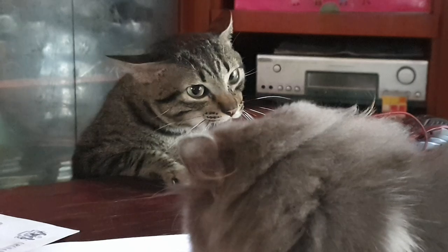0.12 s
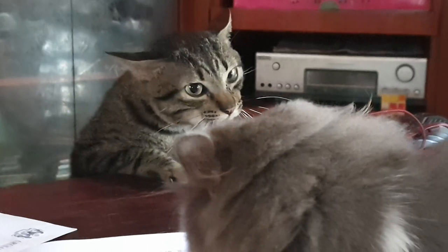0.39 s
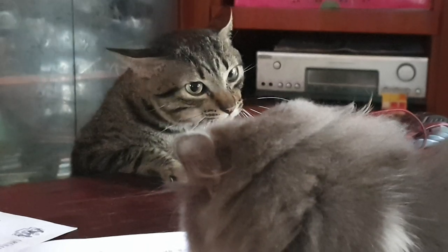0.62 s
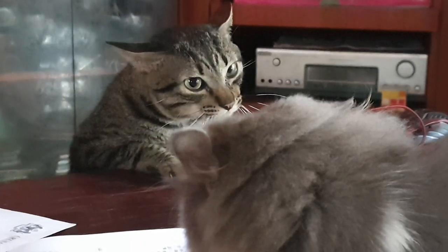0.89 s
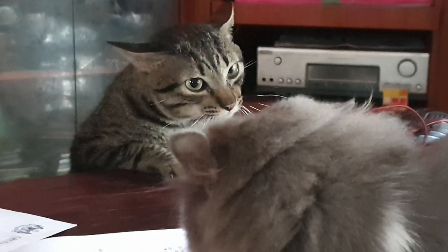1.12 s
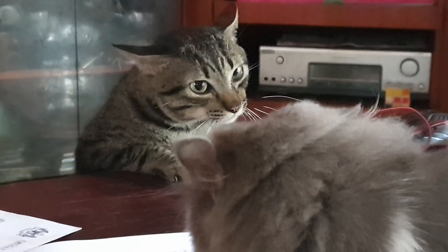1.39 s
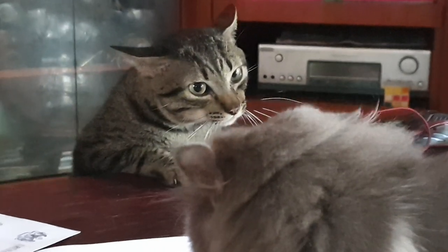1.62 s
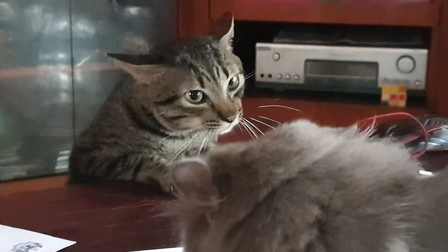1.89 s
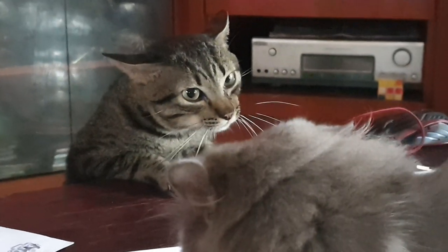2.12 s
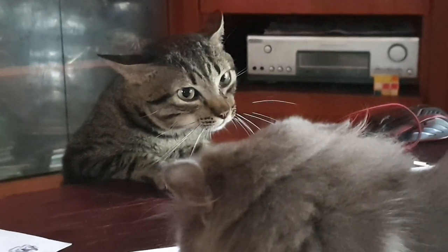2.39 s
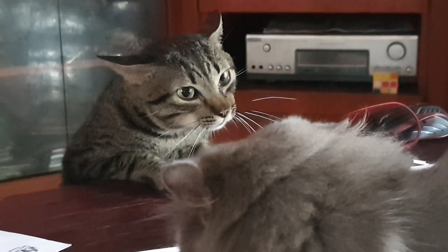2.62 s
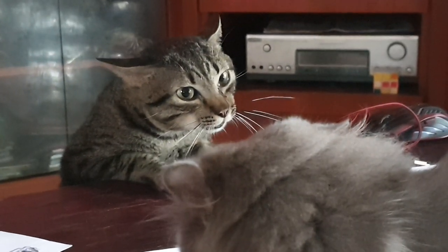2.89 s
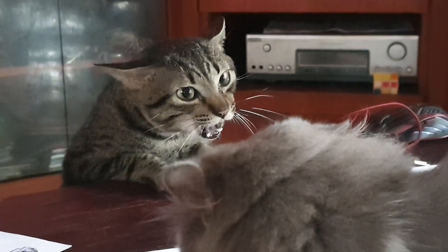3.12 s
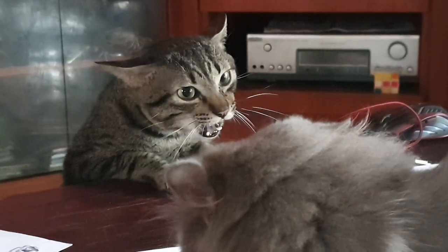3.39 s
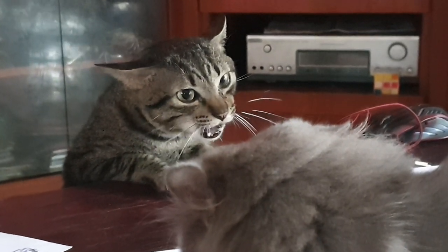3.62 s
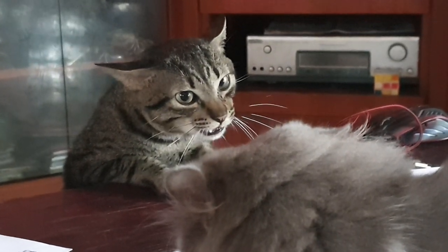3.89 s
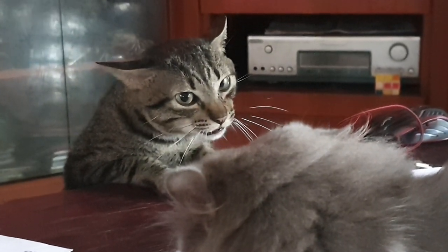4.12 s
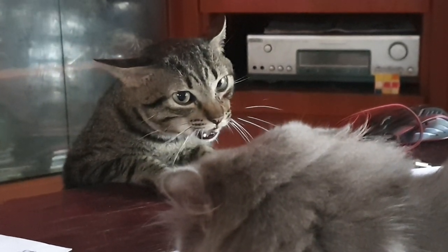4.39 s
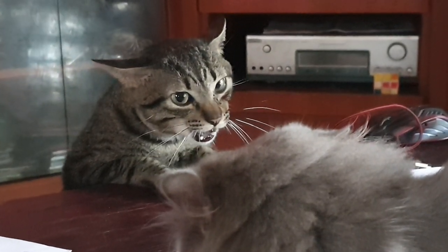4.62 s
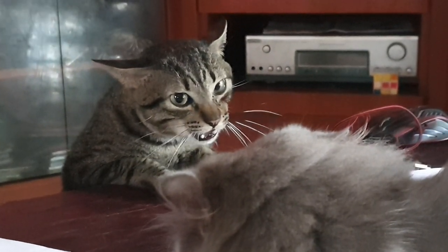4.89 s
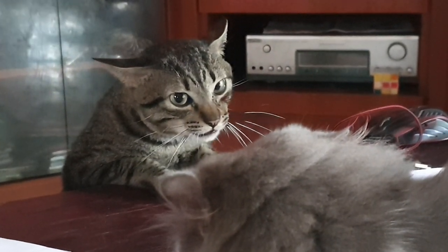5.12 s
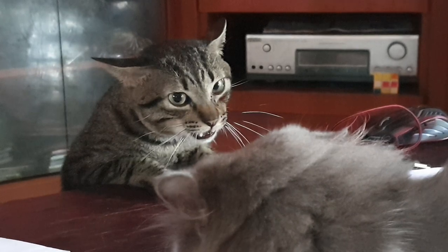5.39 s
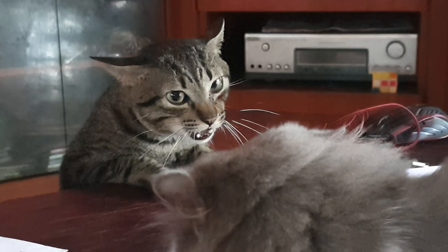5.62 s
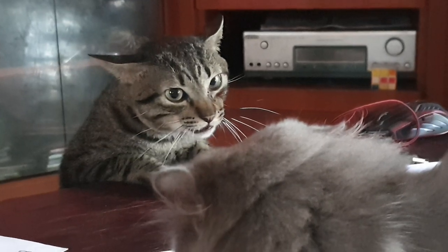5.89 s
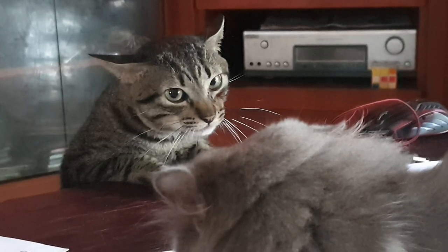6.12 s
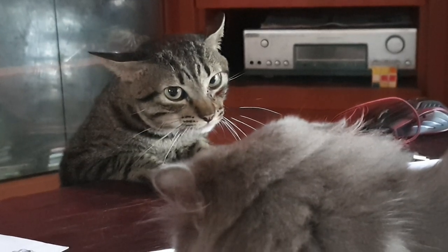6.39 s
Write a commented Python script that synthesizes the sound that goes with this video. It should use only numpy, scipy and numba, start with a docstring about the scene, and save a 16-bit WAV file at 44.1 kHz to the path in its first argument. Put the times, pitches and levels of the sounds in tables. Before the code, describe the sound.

Two angry yowls from one cat facing another indoors. The first starts in full voice and glides down quickly to a rough little release. About two seconds of near-quiet follow: outside rumble, soft hiss, small ticks and rustling. The second lasts over three seconds, scooping up to a piercing cry, then bending through changing vowels before it drops away. Hard surfaces smear each glide; a low engine passes outside. Close stereo pickup, louder on the left.

```python
"""Cat yowling in a living room

A cat on a table yowls twice at another cat, a metre from a small stereo camera in a hard-walled room.
Pulses of its vocal folds pass through throat and mouth resonances; the room smears every glide.
Traffic rumbles outside as filtered noise; a far horn and a passing engine are sums of harmonics.
Paws or hands rustle faintly, as short bursts of noise."""
import sys
import numpy as np
from scipy import signal
from scipy.fft import rfft, irfft, next_fast_len
from scipy.io import wavfile
from scipy.ndimage import uniform_filter1d
from numba import njit

SR = 44100
rng = np.random.default_rng(int(sys.argv[2]) if len(sys.argv) > 2 else 0)


def gain_from_db(level_db):
    """Turn a decibel level (scalar or array-like) into a linear amplitude factor."""
    decades = np.asarray(level_db, float) / 20
    return 10 ** decades


def to_wav(sig):
    """Store sig (one row per channel, or 1-D mono) as 16-bit WAV at the path in sys.argv[1].

    Samples outside -1..1 are clipped; the rate is SR.
    """
    pcm = np.clip(np.atleast_2d(sig), -1, 1) * 32767
    pcm = np.round(pcm).astype(np.int16)
    wavfile.write(sys.argv[1], SR, pcm.T)  # frames by channels


N = 287091  # samples to keep
LEAD = 16384  # samples of sound before the start, so that the room already rings
T = (np.arange(N + LEAD) - LEAD) / SR  # seconds, negative during the lead


def on_log(hz, table, column=1):
    """Read a table whose first column is Hz, on a log-frequency axis."""
    table = np.array(table, float)
    return np.interp(np.log(np.maximum(hz, 1)), np.log(table[:, 0]), table[:, column])


def colour(x, gain):
    """Filter by a gain function of frequency."""
    size = next_fast_len(x.shape[-1])
    spectrum = rfft(x, size) * gain(np.fft.rfftfreq(size, 1 / SR))
    return irfft(spectrum, size)[..., :x.shape[-1]]


def unit(x):
    """Scale to rms 1."""
    return x / np.sqrt(np.mean(x ** 2))


def walk(rate):
    """Smooth chance that turns about rate times a second; spread 1."""
    size = int(SR / rate / 2)
    steps = np.repeat(rng.standard_normal(len(T) // size + 1), size)[:len(T)]
    return unit(uniform_filter1d(steps, 2 * size))


def fold_cycles(firm_start_s):
    """Vocal folds: taut ones beat evenly, slack ones unevenly. Gives pitch, roughness and phase."""
    # The pitch of the folds. Each row: time in seconds, pitch in Hz.
    pitch = [(0, 549.2), (.1, 548.7), (.28, 500.2), (.35, 469), (.47, 435.4), (.63, 410.7), (.79, 380),
             (.84, 355), (3.0, 215), (3.05, 310.5), (3.1, 391), (3.15, 490.2), (3.19, 537.6), (3.24, 569.7),
             (3.29, 585.1), (3.38, 590), (3.47, 585.6), (3.58, 571.9), (3.66, 521), (3.75, 478.6),
             (3.88, 440.9), (3.98, 454), (4.11, 439.2), (4.24, 448.9), (4.29, 440), (4.37, 440),
             (4.45, 465.8), (4.56, 531), (4.62, 527.8), (4.67, 548.6), (4.9, 486.4), (5.03, 437),
             (5.1, 423.3), (5.16, 426.5), (5.29, 421.7), (5.33, 405), (5.38, 436.4), (5.49, 443),
             (5.63, 460.1), (5.71, 462.7), (5.81, 458.2), (5.92, 431.1), (6.0, 423.2), (6.06, 422.8),
             (6.18, 383.4), (6.21, 332)]
    taut_hz, taut_rough, slack_rough = 590, 0.012, 0.14
    firm_s, firm_rough = 0.25, 0.02  # the first breath of the second yowl drives the folds firmly
    hz = uniform_filter1d(np.interp(T, *np.transpose(pitch)), size=600)
    rough = taut_rough + slack_rough * np.clip(1 - hz / taut_hz, 0, 1)
    firm = (T > firm_start_s) & (T < firm_start_s + firm_s)
    rough = np.where(firm, np.minimum(rough, firm_rough), rough)
    uneven_hz = hz * (1 + 0.074 * rough * walk(60.0))
    return hz, rough, 2 * np.pi * np.cumsum(uneven_hz) / SR


def mouth_shapes(partial_hz, coarse, jaw, edge_hz, split_hz, top_hz=14400):
    """Resonances of throat, jaw, tongue, palate and lower and upper muzzle, as power at each partial."""
    # Throat, jaw, tongue and palate resonances. Each row: centre in Hz, width setting in Hz.
    tract = [(950, 570), (1720, 995), (2250, 400), (2750, 530)]
    # Drawing back the lips shortens the muzzle and lifts its resonances.
    # Each row: time in seconds, factor on frequency (reached in full from 8500 Hz up).
    lips = [(0, 1.2), (.4, 1.05), (.8, .98), (3.0, .96), (3.4, .99), (3.8, 1.09), (4.25, 1.04),
            (4.65, 1.17), (5.2, .99), (5.75, 1.1), (6.2, 1.03)]
    # Upper resonances of the muzzle. Each row: frequency in Hz, relative level in dB.
    muzzle_colour = [(3000, -10.5), (3400, -6.5), (3900, -11.5), (4500, -11), (5000, -3.5), (5600, -6),
                     (6300, 0.5), (7200, -13.5), (8300, -10), (9600, -20), (10200, -34), (10900, -32),
                     (11500, -23), (12300, -28), (14100, -27), (15500, -35)]
    jaw_drop_hz = 540  # the jaw resonance sinks this far as the jaw shuts

    centres_hz, widths_hz = (list(c) for c in zip(*tract))
    centres_hz[1] = centres_hz[1] - jaw_drop_hz * (1 - jaw)
    # side pockets of the throat swallow the sound just above the palate resonance
    pockets = 1 + (partial_hz / edge_hz) ** 24
    shapes = []
    for centre, width in zip(centres_hz, widths_hz):
        shapes.append(1 / (1 + (2 * (partial_hz - centre) / width) ** 2) ** 3 / pockets)
    lip_share = np.clip((partial_hz - 6000) / 2500, 0, 1)
    muzzle_hz = partial_hz / np.interp(coarse, *np.transpose(lips)) ** lip_share
    muzzle = gain_from_db(2 * on_log(muzzle_hz, muzzle_colour))
    muzzle = muzzle * (partial_hz > edge_hz) * (partial_hz < top_hz)
    return shapes + [muzzle * (muzzle_hz < split_hz), muzzle * (muzzle_hz >= split_hz)]


@njit
def partials(phase, size, gate, step, fan):
    """Sum of harmonics whose sizes are given every step samples; fan holds their starting phases."""
    out = np.zeros(len(phase))
    for i in range(len(phase) - step):
        j, a = i // step, (i % step) / step
        if gate[j + 1] + gate[j] > 0:
            turn = z = np.exp(1j * phase[i])
            for k in range(size.shape[1]):
                out[i] += (size[j, k] + a * (size[j + 1, k] - size[j, k])) * (z * fan[k]).real
                z = z * turn
    return out


def cat():
    """Two yowls: partials of the fold pulses, each weighted by the resonances it lies in."""
    # The two yowls, a list of rows for each. Each row: time in seconds, effort in dB,
    # jaw opening from 0 to 1, tongue clearance from 0 to 1.
    yowls = [
        [(0, 0, 0.96, 0.86), (.2, -0.5, 0.87, 0.95), (.29, -1, 0.85, 0.93), (.39, -1.5, .85, 0.23),
         (.48, 2, 0.49, 0.48), (.59, -7.5, 0.51, 0.67), (.65, -9.5, 0, 0.49), (.8, -19.5, 0.67, .45),
         (.85, -49, 0.1, .4)],
        [(3.0, -27, .3, 0.15), (3.03, -8.5, 0.8, 0.8), (3.05, 1.5, 0.56, 0.26), (3.09, 1, 0.95, 0.9),
         (3.14, -3, 0.97, 0.86), (3.24, 1.5, 0.94, 0.91), (3.55, 1, 0.91, 0.9), (3.66, -1, 0.94, 0.92),
         (3.82, 0, 0.71, .35), (3.92, -1, 0.74, .75), (4.09, -1.5, 0.44, 0.39), (4.27, 1.5, 0.2, 0.15),
         (4.35, -2, 0.7, 0.69), (4.42, 0, 0.66, 0.08), (4.53, -3.5, 0.88, 0.92), (4.7, -0.5, .9, 0.84),
         (4.86, -0.5, 0.76, 0.77), (4.99, 0.5, 0.64, 0.12), (5.06, 0, 0.55, 0.62), (5.1, -6, 0.6, .63),
         (5.24, -7, 0.62, 0.53), (5.4, -3, 0.6, 0.58), (5.52, -3, .73, 0.22), (5.67, -1.5, 0.82, 0.44),
         (5.88, -1.5, 0.69, 0.17), (5.92, -1, 0.75, 0.6), (5.98, -2.5, 0.35, 0.55), (6.09, -8, 0.18, 0.4),
         (6.205, -15, 0.25, 0.7)],
    ]
    # Rows: first partial, throat, jaw, tongue, palate, lower muzzle, upper muzzle.
    # Each row: level at full opening in dB, dB per dB of effort, dB lost as the jaw shuts,
    # dB lost as the tongue rises.
    response = [(-46.5, 0.18, -1.5, 3.3), (-31.5, 0.6749, -3.16, 2.74), (-18.5, 2.08, 43.5, -2.4),
                (-20.5, 1.68, -3.04, 36.5), (-38, 1.3, 5.5, 23.5), (-51, 1.01, 5.5, -1),
                (-50.5, 1.53, 5.5, 4.5)]
    # on high notes the first partial climbs into the throat resonance and the second climbs out of it
    high_note_hz, high_span_hz, throat_loss_db, first_gain_db = 506.6, 50, 12.5, 1
    edge_hz, split_hz = 2930, 7100  # where the muzzle range starts and where it is split
    shimmer_db, flicker_db, hoarse, breathy, rasp_hz = 0.5, 4.0, 4.0, 10.0, 220
    idle, fade_s = 0.16, 0.011
    step = 64  # samples between settings of the partials
    coarse = T[::step, None]

    s, *columns = np.transpose(np.concatenate(yowls))
    effort_db, jaw, tongue = (np.interp(coarse, s, c) for c in columns)
    first_db, throat_db, *levels_db = (
        db + a * effort_db - b * (1 - jaw) - c * (1 - tongue) for db, a, b, c in response)
    # the first yowl is already sounding when the lead begins
    starts, ends = (T[0] - fade_s, yowls[1][0][0]), (yowls[0][-1][0], s[-1])
    gate = sum(np.clip(np.minimum(coarse - a, b - coarse) / fade_s, 0, 1) for a, b in zip(starts, ends))

    hz, rough, phase = fold_cycles(starts[1])
    coarse_hz = hz[::step, None]
    climb = np.clip((coarse_hz - high_note_hz) / high_span_hz, 0, 1)
    levels_db.insert(0, throat_db - throat_loss_db * climb)
    order = np.arange(1, 41)
    partial_hz = order * coarse_hz
    shapes = mouth_shapes(partial_hz, coarse, jaw, edge_hz, split_hz)
    # each resonance shares its power among the partials inside it, and fades when none is near
    power = sum(gain_from_db(2 * db) * p / (p.sum(1, keepdims=True) + idle) for db, p in zip(levels_db, shapes))
    power[:, :1] = gain_from_db(2 * (first_db + first_gain_db * climb))

    # in the muzzle range each partial swells and breaks on its own
    high, top = partial_hz > edge_hz, partial_hz > split_hz
    flicker = unit(uniform_filter1d(rng.standard_normal(power.shape), size=30, axis=0))
    size = np.sqrt(2 * power) * gate * gain_from_db(flicker_db * flicker * high)
    fan = np.exp(0.7j * order ** 2)
    body, sheen, air = (
        partials(phase, size * part, gate[:, 0], step, fan) for part in (~high, high & ~top, top))

    # uneven cycles put grain between the partials, most in the treble
    rasp = unit(colour(rng.standard_normal(len(T)), lambda f: 1 / (1 + (f / rasp_hz) ** 8)))
    grain = rough * rasp
    voice = body * (1 + grain) + sheen * (1 + hoarse * grain) + air * (1 + breathy * grain)
    return gain_from_db(shimmer_db * walk(30.0)) * voice


def room(x):
    """Direct sound plus a diffuse tail, another at each port, all ringing through the standing waves."""
    # How long the room rings. Each row: frequency in Hz, seconds to fall by 60 dB.
    ring_times = [(200, .89), (800, 0.55), (2000, 0.5), (5000, 0.86), (12000, 0.15)]
    # Standing waves between table, cabinet and walls; a negative level is a dip.
    # Each row: centre in Hz, width in Hz, gain at the centre in dB.
    standing = [(819, 14, 6.5), (1307.5, 56, 11), (1218, 210, -20), (1989, 51, 8), (2234, 34, 3.5),
                (2692, 61, 5.5), (2950, 150, -7)]
    gap_s, tail_db = 0.0063, -8  # wait before the tail; its energy against the direct sound
    t = np.arange(LEAD) / SR
    tail = 0
    for hz in 125 * 2 ** np.arange(8.0):  # one noise band per octave
        noise = rng.standard_normal((2, LEAD))
        band = colour(noise, lambda f: np.exp(-np.log2(np.maximum(f, 1) / hz) ** 2))
        tail = tail + band * gain_from_db(-60 * t / on_log(hz, ring_times)) * (t > gap_s)
    tail = tail * gain_from_db(tail_db) / np.sqrt(np.sum(tail ** 2, 1, keepdims=True))
    wet = x + signal.fftconvolve(x[None], tail, axes=1)[:, :len(x)]
    return colour(wet, lambda f: 1 + sum(
        (gain_from_db(db) - 1) / (1 + 2j * (f - hz) / width) for hz, width, db in standing))


def shade_right(x):
    """The camera body shades and delays the sound on its way to the right port."""
    # Each row: frequency in Hz, right minus left in dB, lag of the right port in radians.
    shade = [(200, -5.5, .2), (500, -4.5, .4), (900, -7.5, .6), (1700, -10, .3), (2300, -4.5, .3),
             (3000, -5, .5), (4100, -2.5, .8), (5000, -1.5, 1.7), (6300, -4, 2.6), (7600, -7, 3.0),
             (9200, -9, 3.4), (10400, -2.5, 4.7), (11700, 1.2, 5.9), (13000, -2.5, 6.7), (14500, -7, 6.9)]
    return colour(x, lambda f: gain_from_db(on_log(f, shade)) * np.exp(-1j * on_log(f, shade, column=2)))


def traffic(alike=0.94):
    """Traffic through the walls: low noise nearly alike at both ports, slowly rising and falling."""
    # Each row: time in seconds, level in dB before the lean to the left.
    traffic_levels = [(0, -59), (1.5, -61), (3.2, -59), (4.2, -63.5), (5.2, -61), (6.51, -56)]
    # Colour of the rumble. Each row: frequency in Hz, relative level in dB.
    rumble = [(20, -19.5), (55, -8.5), (99, -0.5), (128, -14), (190, -15.5), (260, -19), (400, -28.5),
              (850, -31), (1400, -35.5), (2500, -43), (5000, -70.5)]
    noise = rng.standard_normal((3, len(T)))
    shared = colour(noise[0], lambda f: 1 / (1 + (f / 600) ** 2))
    ports = shared * alike + noise[1:] * np.sqrt(1 - alike ** 2)
    ports = unit(colour(ports, lambda f: gain_from_db(on_log(f, rumble))))
    return ports * gain_from_db(np.interp(T, *np.transpose(traffic_levels)))


def microphone_hiss():
    """Each microphone's own steady hiss: separate noise at left and right."""
    # Each row: frequency in Hz, left level in dB, right level in dB, both relative.
    hiss_colour = [(302, 17, 10), (2000, 3.5, -3), (4000, 0.5, -1), (7400, -9.5, -3.5), (8000, -0.5, -10),
                   (9000, 1, -10.5), (9600, 1.5, -3.5), (12000, 3, -4), (16000, -3, -1)]
    sides = [colour(rng.standard_normal(N), lambda f: gain_from_db(on_log(f, hiss_colour, column=c)))
             for c in (1, 2)]
    return gain_from_db(-80) * np.array(sides)


def rustles(size=16384):
    """Short bursts of friction noise around one centre each."""
    # Faint rustles, ticks and the two puffs as the folds let go. Each row: start in seconds,
    # noise level in dB before its envelope and the lean, centre in Hz, decay in seconds.
    bursts = [(0.824, -60, 693, 0.022), (1.665, -77, 7000, .0018), (2.045, -75.5, 7000, .11),
              (2.085, -57.5, 6620, 0.0014), (2.25, -80, 6000, .078), (2.312, -65.5, 700, 0.15),
              (2.636, -64, 1100, .0083), (2.68, -81, 6360, 0.084), (2.73, -70.5, 1300, .012),
              (6.19, -45, 707, 0.016)]
    width, rise = 1, 0.15  # shares of the centre and of the decay
    out, age = np.zeros(len(T) + size), np.arange(size) / SR
    for s, db, hz, decay in bursts:
        noise = rng.standard_normal(size)
        grain = colour(noise, lambda f: 1 / (1 + (2 * (f - hz) / (width * hz)) ** 4))
        envelope = np.minimum(age / (rise * decay), 1) * np.exp(-age / decay)
        at = LEAD + int(s * SR)
        out[at:at + size] += unit(grain) * gain_from_db(db) * envelope
    return out[:len(T)]


def horn(waver_db=4):
    """Far two-tone horn: only the harmonics between about 1.8 and 3.3 kHz are heard, fluttering."""
    # Each row: start in seconds, end in seconds, pitch in Hz, base level in dB.
    tones = [(2.55, 2.78, 262.4, -87), (2.59, 2.98, 394, -89)]
    # Each row: frequency in Hz, relative level in dB.
    horn_colour = [(1700, -25), (2000, -8), (2370, 0), (2750, -7), (3150, 2), (3400, -25)]
    out = 0
    for start, end, hz, db in tones:
        fade = gain_from_db(-np.maximum(T - end, 0) * 150)  # echoes fade after the blast, 150 dB a second
        blow = np.clip((T - start) / 0.072, 0, 1) * fade
        for k in range(int(1800 / hz) + 1, int(3300 / hz) + 1):
            level_db = db + on_log(k * hz, horn_colour) + waver_db * walk(19.0)
            out = out + blow * np.cos(2 * np.pi * k * hz * T) * gain_from_db(level_db)
    return out


def engine(waver_db=2):
    """Passing engine: three wavering harmonics of its firing rate, which sags as it passes."""
    # Each row: time in seconds, firing rate in Hz, base level in dB.
    passing = [(5.3, 111.2, -81), (5.5, 113.2, -77.5), (5.749, 111.5, -66), (5.999, 104.5, -66),
               (6.2, 103.2, -65.5), (6.51, 97.8, -66)]
    # Each row: multiple of the firing rate, dB added to the base level.
    orders = [(1, 3), (2, 4.5), (3, -3)]
    s, hz, db = np.transpose(passing)
    phase = 2 * np.pi * np.cumsum(np.interp(T, s, hz)) / SR
    out = 0
    for k, order_db in orders:
        level_db = np.interp(T, s, db) + order_db + waver_db * walk(17.7)
        out = out + np.cos(k * phase) * gain_from_db(level_db) * (T > s[0])
    return out


def scene():
    """The cat in its room reaches the right port later and shaded; the other sounds too lean left."""
    left, right = room(cat()) * gain_from_db(1.5)
    voice = np.array([left, shade_right(right)])
    lean = gain_from_db(np.array([[3.0], [-4.5]]))  # dB, left and right
    others = traffic() + rustles() + horn() + engine()
    return (voice + lean * others)[:, LEAD:]


def low_pass(x):
    """Removes everything above the highest recorded frequency."""
    return signal.sosfilt(signal.butter(12, 15720, fs=SR, output="sos"), x)


def record(dry):
    """The two microphones add their hiss to the scene."""
    return low_pass(dry + microphone_hiss())


dry = scene()
out = record(dry)
to_wav(out)
```